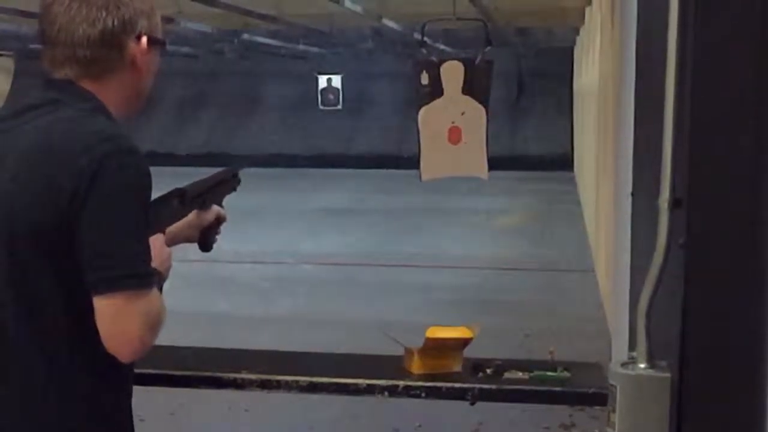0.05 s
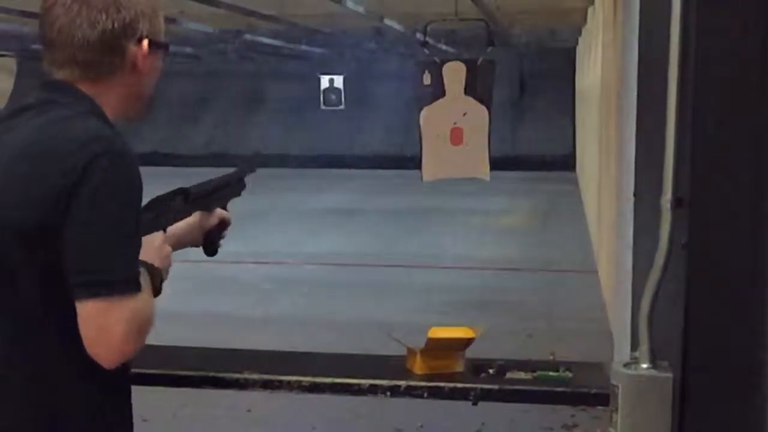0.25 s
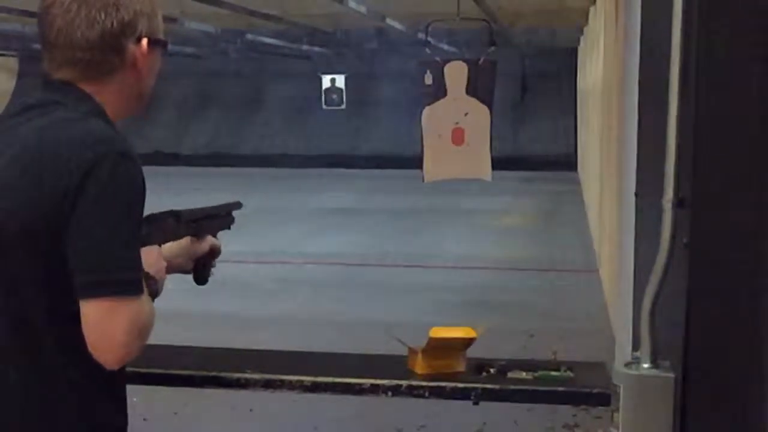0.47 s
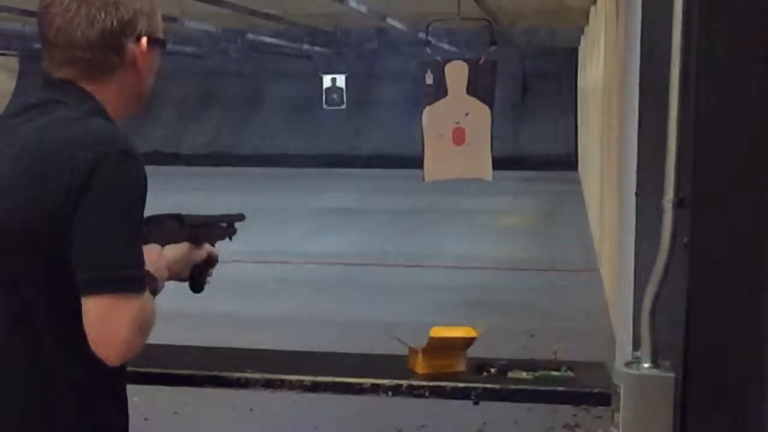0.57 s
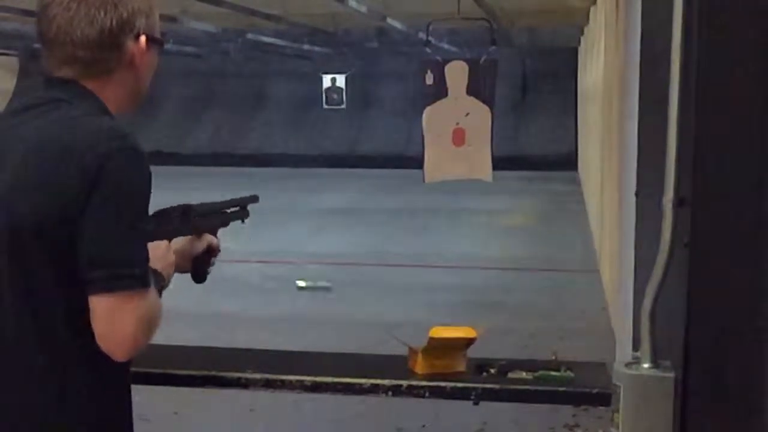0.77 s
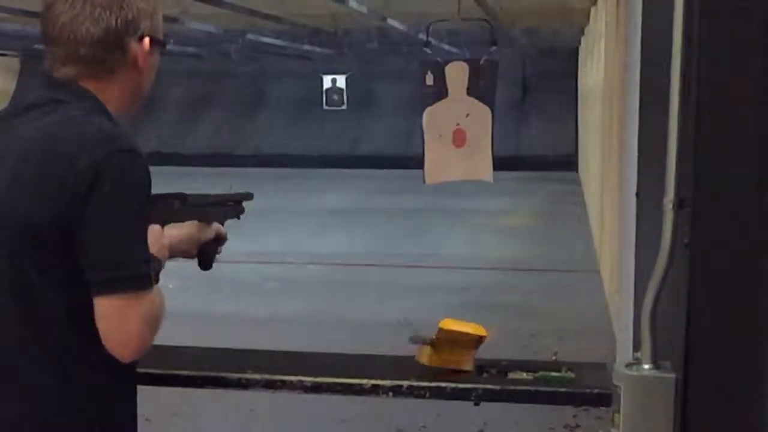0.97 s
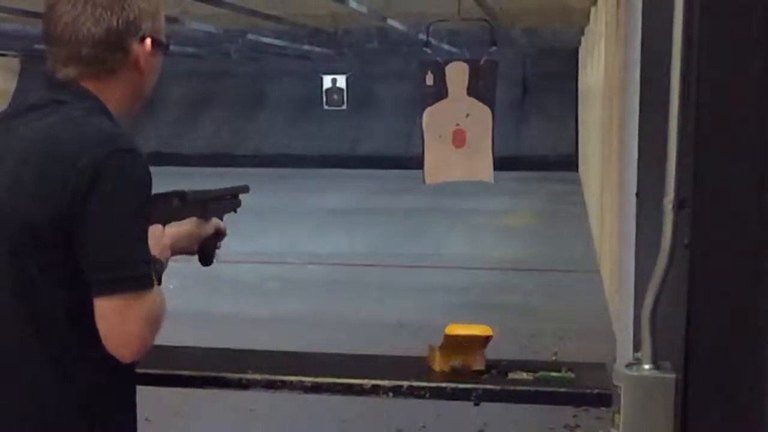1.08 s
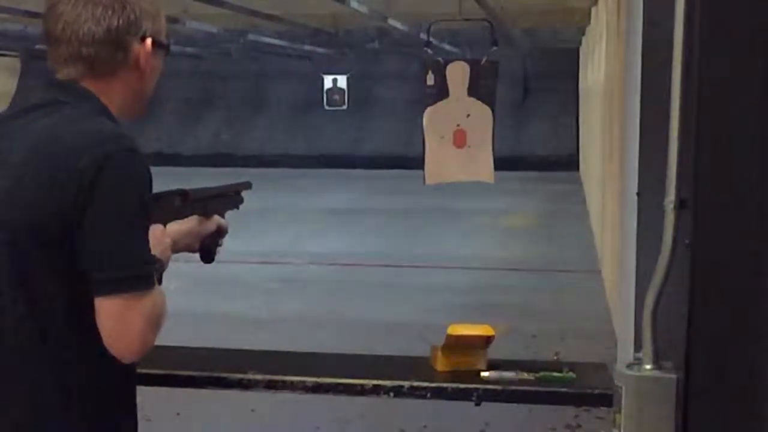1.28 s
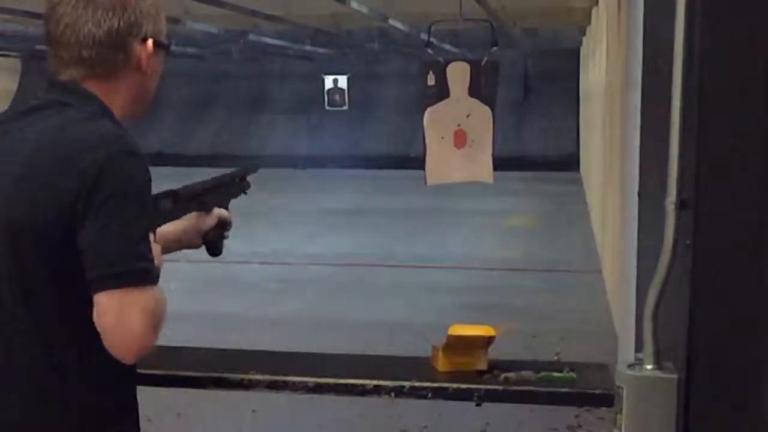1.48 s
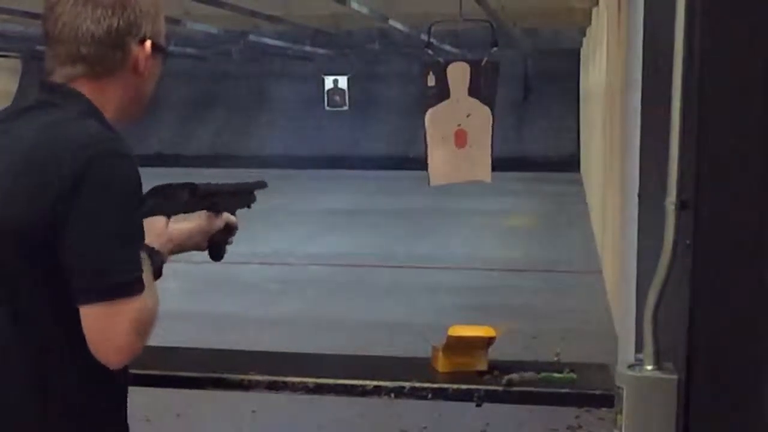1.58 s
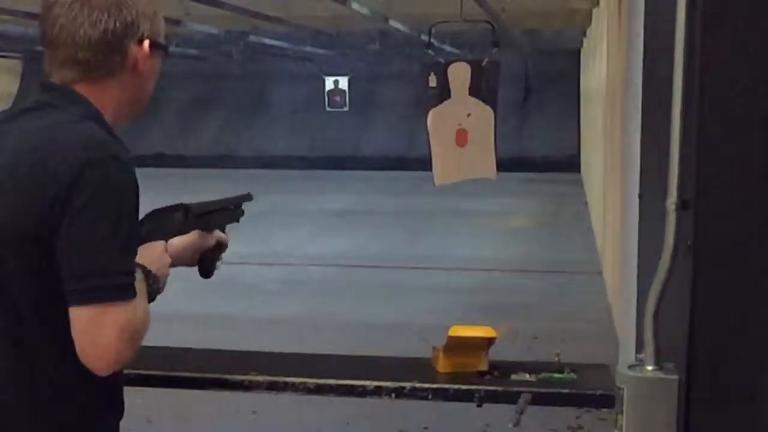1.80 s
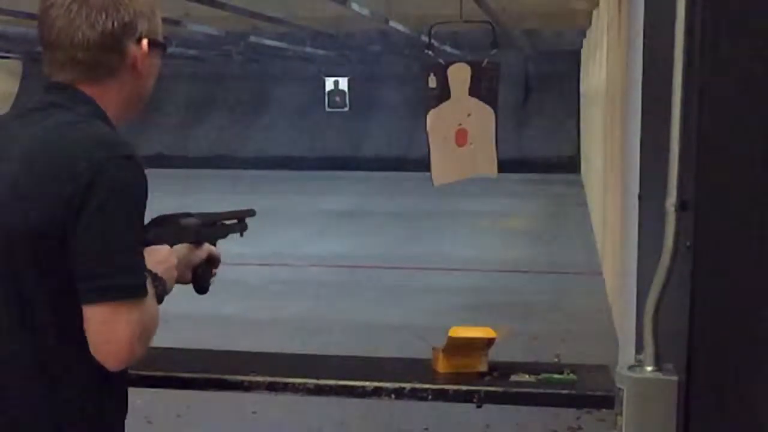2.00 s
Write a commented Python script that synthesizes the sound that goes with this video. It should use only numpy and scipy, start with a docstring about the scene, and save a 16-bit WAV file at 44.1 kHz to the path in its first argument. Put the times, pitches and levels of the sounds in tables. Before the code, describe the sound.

Two shotgun blasts overload a nearby microphone and reverberate down an indoor shooting lane. Between them the pump clacks back and forth and a spent shell clatters on concrete, over faint ventilation rumble.

```python
"""Indoor range, camera microphone close behind the shooter: two shots from a pump shotgun.
Over the ventilation the hammer clicks; the first blast fills the booth and overloads the microphone,
thumps back from the far wall and rolls on down the concrete lane. The slide is racked back and forth,
steel knocking on steel. A little farther off, the spent plastic shell bounces ever faster on the floor.
Then the second blast overloads the microphone again and dies away down the lane."""
import sys
import numpy as np
from scipy import signal
from scipy.fft import rfft, irfft
from scipy.io import wavfile

SR = 44100
rng = np.random.default_rng(int(sys.argv[2]) if len(sys.argv) > 2 else 0)


def inscribe(sig):
    """Save sig as 16-bit PCM at rate SR to the path in sys.argv[1].

    A 1-D sig is mono; a 2-D sig holds one channel per row.
    Samples are clipped to [-1, 1] before scaling.
    """
    pcm = np.round(np.clip(np.atleast_2d(sig).T, -1, 1) * 32767)
    wavfile.write(sys.argv[1], SR, pcm.astype(np.int16))


N = 90404


def amp(db):
    return 10 ** (np.asarray(db) / 20)


def read(table, hz):
    """Interpolates (freq_hz, value) rows along log frequency."""
    table = np.array(table, float)
    return np.interp(np.log(hz + 1), np.log(table[:, 0] + 1), table[:, 1])


def add(mix, start_s, sound):
    """Mixes a sound in from start_s on."""
    part = mix[round(start_s * SR):][:len(sound)]
    part += sound[:len(part)]


def noise(spectrum, size, resonances=(), tilt_db=0):
    """Noise at rms 1 with a given spectrum, resonances and tilt per octave."""
    hz = np.fft.rfftfreq(size, 1 / SR)
    db = read(spectrum, hz) + tilt_db * np.log2((hz + 100) / 3000)
    for centre, width, lift in resonances:
        db = db + lift / (1 + (2 * (hz - centre) / width) ** 2)
    phases = np.exp(2j * np.pi * rng.random(len(hz)))
    wave = irfft(amp(db) * phases, size)
    return wave / np.sqrt(np.mean(wave ** 2) + 1e-20)


def dying_noise(bands, resonances=()):
    """Coloured noise whose bands each die away at their own t60."""
    t, hz = np.arange(N) / SR, np.fft.rfftfreq(N, 1 / SR)
    spectrum = rfft(noise(bands, N, resonances))
    centres, _, t60s = zip(*bands)
    out = np.zeros(N)
    for one_band, t60 in zip(np.eye(len(bands)), t60s):
        weight = read(list(zip(centres, one_band)), hz)
        out += irfft(spectrum * weight, N) * amp(-60 * t / t60)
    return out


def flicker(size, depth_db, grain_s):
    """A gain that moves to a new random level once per grain."""
    steps = rng.standard_normal(size)
    return amp(depth_db * np.interp(np.arange(size) / SR / grain_s, np.arange(size), steps))


def strike(spectrum, resonances, db, decay_s, tilt_db, low_cut_hz, booth_db=-60):
    """A hard contact: a short burst of dense resonances, prolonged by the booth's close walls."""
    t = np.arange(8192) / SR
    direct_power = np.exp(-2 * t / decay_s)
    walls = (t > .0013) * np.exp(-2 * t / .015)  # reflections begin after 1.3 ms
    reflected_power = abs(signal.fftconvolve(direct_power, walls / walls.sum())[:len(t)])
    envelope = np.sqrt(direct_power + amp(booth_db) ** 2 * reflected_power)
    burst = amp(db) * noise(spectrum, len(t), resonances, tilt_db) * envelope
    return signal.sosfilt(signal.butter(4, low_cut_hz, "high", fs=SR, output="sos"), burst)


# moving air: freq_hz, level_db
VENT_SPECTRUM = [(20, -28), (40, -16.5), (62, 6), (90, -8), (150, -9.5), (300, -20.5), (620, -9.5),
                 (850, -9.5), (1300, -9), (2200, -12.5), (4000, -30.5), (7000, -31), (11000, -50),
                 (16000, -49.5)]
# duct resonances: centre_hz, width_hz, lift_db
DUCT_MODES = [(59.6, 20, 1), (131, 22, 5), (343, 81, 10), (593, 20, 10)]

def ventilation():
    """Room tone: air rumbles steadily through resonant ducts."""
    return amp(-44.5) * noise(VENT_SPECTRUM, N, DUCT_MODES)


# bright wash of reverberation: freq_hz, level_db
EARLIER_SPECTRUM = [(200, -24.5), (1500, -15), (4000, 0), (8000, -3.5), (12000, -7.5), (16000, -16)]

def earlier_clack():
    """The last of an earlier clack's reverberation fades at the very start."""
    t = np.arange(N) / SR
    return amp(-49) * noise(EARLIER_SPECTRUM, N) * np.exp(-t / .056)


# the range's answer to small sounds: freq_hz, level_db, t60_s
ROOM_BANDS = [(100, 9, 0.65), (1000, 0, 0.71), (3000, 0.5, 0.6), (6900, 1.5, 0.44), (11000, -8.5, 0.55),
              (16000, -11, 0.2)]

def room(dry, tail_db):
    """Small sounds reach the microphone directly, then as reverberation."""
    tail = dying_noise(ROOM_BANDS)
    return dry + amp(tail_db) * signal.fftconvolve(dry, tail / np.linalg.norm(tail))[:N]


# shell hitting the floor: start_s, level_db, decay_s, tilt_db_per_octave, low_cut_hz
SHELL_BOUNCES = [(1.2268, -28, 0.0067, -1.1, 560), (1.3573, -28, 0.0071, -2, 595),
                 (1.449, -26.5, 0.0062, -1.7, 980), (1.516, -31.5, 0.0084, -3.5, 1300),
                 (1.562, -35, 0.0094, -0.5, 1300), (1.585, -33, 0.036, -0.5, 1290)]
# plastic on concrete: freq_hz, level_db
HULL_SPECTRUM = [(100, -23.5), (600, -8), (1300, 0), (2400, 1), (4200, -0.5), (5800, -8.5), (7500, -16),
                 (9500, -12), (11000, -25), (16000, -18)]
# resonances of the plastic tube: centre_hz, width_hz, lift_db
HULL_MODES = [(1380, 90, 6), (1823, 65, 8), (2310, 65, 9)]

def spent_shell():
    """The empty hull bounces on concrete, farther from the microphone, so the booth reflects more."""
    out = np.zeros(N)
    for start_s, *bounce in SHELL_BOUNCES:
        add(out, start_s, strike(HULL_SPECTRUM, HULL_MODES, *bounce, booth_db=-.5))
    return room(out, tail_db=-13)


# strokes back and forth: start_s, length_s, level_db
SLIDE_STROKES = [(0.694, .11, -42.5), (0.934, 0.08, -43.5)]
# sliding friction: freq_hz, level_db
FRICTION_SPECTRUM = [(200, -24.5), (1500, -15), (4000, 0), (8000, -3.5), (12000, -7.5), (16000, -16)]

def slide():
    """The fore-end rubs along its tube, grainy and louder as the hand speeds up."""
    out, t = np.zeros(N), np.arange(SR // 4) / SR
    for start_s, length_s, db in SLIDE_STROKES:
        grain = flicker(len(t), depth_db=2.5, grain_s=.002)
        speed = t / length_s * (t < length_s)
        add(out, start_s, amp(db) * noise(FRICTION_SPECTRUM, len(t)) * grain * speed)
    return out


# hollow body of the fore-end: freq_hz, level_db
FORE_END_SPECTRUM = [(300, -25), (520, -8), (610, 2), (760, -5), (1000, 0), (1300, -8), (3000, -25)]

def fore_end_clunk():
    """The fore-end stops home with a hollow clunk."""
    out = np.zeros(N)
    clunk = strike(FORE_END_SPECTRUM, (), db=-32, decay_s=.011, tilt_db=0, low_cut_hz=300, booth_db=-4.5)
    add(out, 1.025, clunk)
    return out


# knocks of the action: start_s, level_db, decay_s, tilt_db_per_octave, low_cut_hz
ACTION_KNOCKS = [(0.1626, -10, .001, 1, 1100), (0.17, -20, 0.0017, -5.5, 1100),
                 (.776, -26, 0.0059, .5, 1000), (.7818, -25, 0.0064, 2.5, 1100),
                 (0.7876, -20.5, 0.0027, 3, 1010), (0.818, -34, 0.013, 3.5, 1190),
                 (0.9752, -35.5, 0.0089, -0.5, 1200), (0.997, -30.5, 0.0062, -3, 1400),
                 (1.018, -29, 0.012, -2, 900), (1.0233, -17.5, 0.0046, -0.5, 515),
                 (1.0292, -18, 0.005, 1, 520)]
# steel on steel: freq_hz, level_db
STEEL_SPECTRUM = [(100, -32), (500, -16.5), (900, -9.5), (1300, -1.5), (2500, 1.5), (4000, 2.5), (7000, -4),
                  (10000, -4), (13000, -5.5), (16000, -11)]
# receiver resonances: centre_hz, width_hz, lift_db
RECEIVER_MODES = [(1300, 90, -1), (1720, 69, 7.5), (2600, 70, 2.5), (2832, 74, 5), (4060, 120, 3),
                  (4730, 87, -8), (6550, 300, 6.5)]

def action_clacks():
    """Hammer and bolt knock against the steel receiver, close to the microphone."""
    out = np.zeros(N)
    for start_s, *knock in ACTION_KNOCKS:
        add(out, start_s, strike(STEEL_SPECTRUM, RECEIVER_MODES, *knock, booth_db=-4.5))
    return out


# knocks that ring the barrel: start_s, level_db
RINGING_KNOCKS = [(0.1618, -26.5), (0.7863, -30.5)]
# notes of the barrel: pitch_hz, level_db, t60_s
BARREL_MODES = [(1300, 3.5, 0.058), (1390, -11, 0.098), (3980, -9, 0.09), (4070, -2, 0.1), (6650, -15, .06)]

def barrel_ring():
    """Two hard knocks set the barrel ringing briefly."""
    out, t = np.zeros(N), np.arange(SR // 4) / SR
    for start_s, knock_db in RINGING_KNOCKS:
        for hz, mode_db, t60 in BARREL_MODES:
            add(out, start_s, amp(knock_db + mode_db - 60 * t / t60) * np.sin(2 * np.pi * hz * t))
    return out


# sharp echoes of the blasts: start_s, level_db, decay_s, tilt_db_per_octave, low_cut_hz
SLAP_ECHOES = [(.3068, -13, .003, 10, 800), (.3492, -15, .002, -17, 200), (1.7354, -10, 0.0015, -11, 200)]
# their colour: freq_hz, level_db
SLAP_SPECTRUM = [(100, -31), (2000, 21), (12000, 4), (16000, -15)]

def slaps():
    """Single hard reflections of the blasts snap back at the microphone."""
    out = np.zeros(N)
    for start_s, *echo in SLAP_ECHOES:
        add(out, start_s, strike(SLAP_SPECTRUM, (), *echo))
    return out


# low thumps, first the blast's own push, then its return off the far wall: start_s, level_db, decay_s,
# end_pitch_hz
LOW_THUMPS = [(0.2685, 1.5, 0.016, 75), (0.3505, -6.5, 0.0085, 53.7), (1.65, -4.5, 0.023, 80),
              (1.7373, 1.5, 0.013, 48)]

def booms(start_hz=229, sag_s=.0031):
    """Each blast pushes out a low thump that sags in pitch, and the pressure wave comes back from the far wall
    as another."""
    out, t = np.zeros(N), np.arange(SR // 2) / SR
    for start_s, db, decay_s, end_hz in LOW_THUMPS:
        hz = end_hz + (start_hz - end_hz) * np.exp(-t / sag_s)
        add(out, start_s, amp(db) * np.sin(2 * np.pi * np.cumsum(hz) / SR) * np.exp(-t / decay_s))
    return out


# reverberation of the concrete lane: freq_hz, level_db, t60_s
LANE_BANDS = [(25, -6, 0.81), (70, 4, 0.82), (152, 7.5, 0.99), (278, -3.5, 0.88), (700, -5.5, 1.075),
              (1150, -1, 1.11), (2240, -1, 0.99), (3800, -8, 0.98), (6400, -14, 0.87), (10150, -31, 0.83),
              (16000, -61, 1)]

def lane_tail(return_s=.228, rise_s=.03):
    """The lane's dark reverberation swells as the sound comes back up from the far wall."""
    t = np.arange(N) / SR
    swell_db = -11.5 * (.5 - .5 * np.tanh((t - return_s) / rise_s))
    hold_db = 3.5 * np.exp(-((t - .41) / .095) ** 2)  # a broad later return holds the tail up
    tail = dying_noise(LANE_BANDS) * amp(swell_db + hold_db)
    return tail / np.std(tail[t < 2 * return_s])


# the two shots, ahead of the overload: start_s, blast_db, tail_db
GUNSHOTS = [(.227, 6, -27.5), (1.6127, 6, -28)]
# blast in the booth: freq_hz, level_db, t60_s
BLAST_BANDS = [(24.3, 0, .2), (64, 7.5, 0.25), (155, 5, 0.25), (310, 0.5, 0.33), (586, -7.5, 0.38),
               (1210, -1.5, .32), (2140, -5.5, 0.32), (3880, -10, 0.32), (6480, -11.5, 0.32),
               (11100, -18.5, 0.28), (16000, -15.5, 0.16)]
# booth resonances: centre_hz, width_hz, lift_db
BOOTH_MODES = [(64, 9.8, 8.5), (135, 42, 3.5), (277, 27, 3.5), (351, 26, 0.5), (389, 15, 3.5),
               (618, 61, 8.5), (760, 20, 3.5), (1161, 19, 9.5)]

def shots(attack_s=.0045, dense_s=.03):
    """Each blast crackles with crowding reflections in the booth, then rolls down the lane."""
    out, t = np.zeros(N), np.arange(N) / SR
    attack_db = -23 * np.maximum(1 - (t / attack_s) ** 2, 0)
    dense_db = 4 * np.exp(-(t / dense_s) ** 2)  # lift from the first, densest reflections
    for start_s, blast_db, tail_db in GUNSHOTS:
        blast = dying_noise(BLAST_BANDS, BOOTH_MODES)
        crackle = flicker(N, depth_db=1.25, grain_s=.003)
        add(out, start_s, amp(blast_db + attack_db + dense_db) * blast * crackle)
        add(out, start_s, amp(tail_db) * lane_tail())
    return out


def scene():
    """The range as it arrives just behind the shooter, in mono."""
    gunfire = shots() + slaps() + booms()
    action = room(action_clacks() + slide(), tail_db=-10.5) + fore_end_clunk() + barrel_ring()
    return (gunfire + action + spent_shell() + earlier_clack() + ventilation())[None]


def record(dry):
    """The camera microphone flattens the blasts at its ceiling; the highest treble is then cut."""
    ceiling, knee_hardness, cutoff_hz = .61, 6.8, 15450
    clipped = dry / (1 + abs(dry / ceiling) ** knee_hardness) ** (1 / knee_hardness)
    lowpass = signal.firwin(255, cutoff_hz, window=("kaiser", 9), fs=SR)
    return signal.oaconvolve(clipped, lowpass[None], "same")


dry = scene()
out = record(dry)
inscribe(out)
```